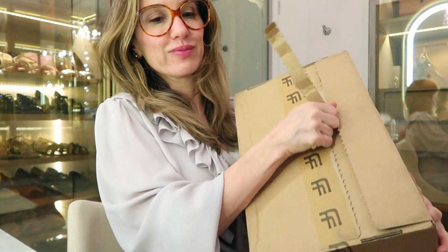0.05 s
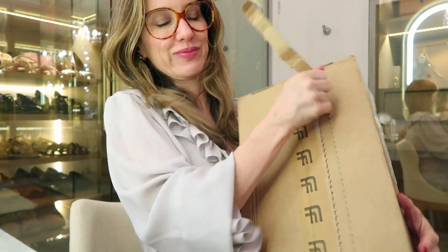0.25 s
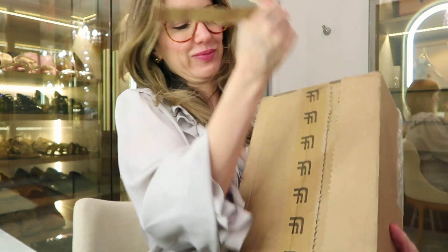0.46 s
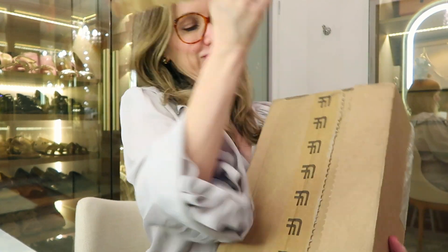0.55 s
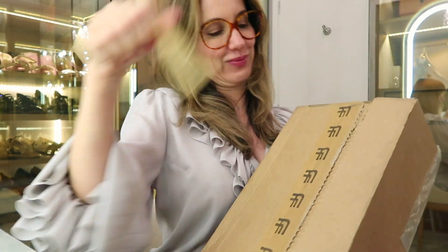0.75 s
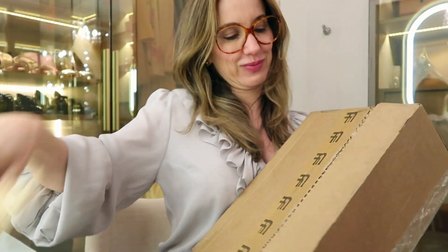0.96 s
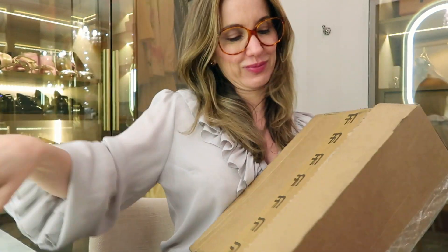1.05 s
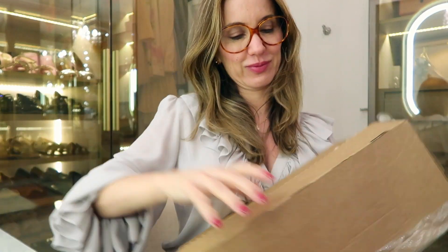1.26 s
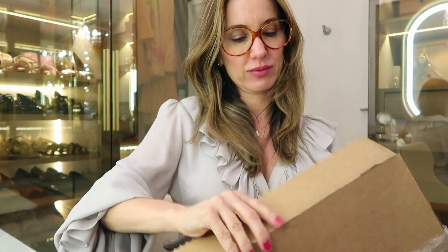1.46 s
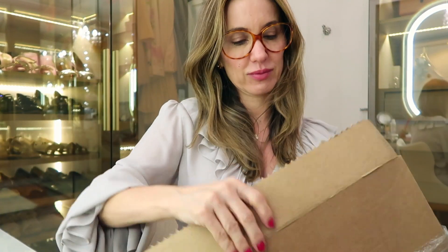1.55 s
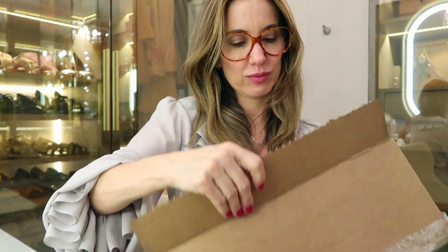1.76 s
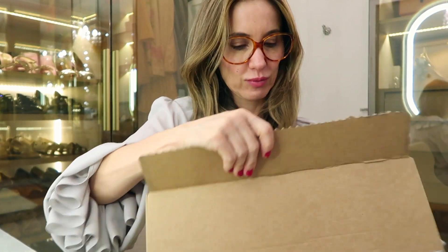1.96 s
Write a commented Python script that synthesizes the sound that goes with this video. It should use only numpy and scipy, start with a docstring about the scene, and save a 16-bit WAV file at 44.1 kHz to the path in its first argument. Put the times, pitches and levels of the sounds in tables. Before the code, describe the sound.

A cardboard box is torn open by hand: its strip comes off in one quick, crackling rip with hollow knocks. After a lull, the flaps are pried up with softer rasps and cracks, close to the microphone in a quiet room.

```python
"""A quiet room hums faintly around a cardboard box, close to a stereo microphone.
After a light rustle, a strip rips off from about 0.24 to 0.5 s: thousands of fibres snap, the edge
sticks and slips in sharp cracks, and knocks ring the hollow box. A lull follows. From about 1.15 s
to the end at 2 s, a hand pries the flaps with softer rasps, cracks and knocks."""
import sys
import numpy as np
from scipy import signal
from scipy.fft import rfft, irfft
from scipy.io import wavfile
from scipy.ndimage import uniform_filter1d

SR = 44100
rng = np.random.default_rng(int(sys.argv[2]) if len(sys.argv) > 2 else 0)


def waveform_to_disk(signal):
    """Save audio, clipped to [-1, 1], as 16-bit WAV at the path in sys.argv[1]."""
    frames = np.transpose(np.atleast_2d(signal))
    scaled = np.clip(frames, -1, 1) * 32767
    samples = np.round(scaled).astype(np.int16)
    wavfile.write(sys.argv[1], SR, samples)


N = 88200

# Tone of the hum that both channels share. Each row: frequency in Hz, relative level in dB.
HUM_TONE = [(15, -41.5), (30, -19), (50, -2), (75, -11), (100, -3.5), (150, 2), (210, -11.5), (300, -23.5),
            (500, -22.5), (1000, -25.5), (3500, -32.5), (7000, -39.5), (10000, -46.5), (15500, -65)]
# Tone of the hum's left-right difference. Each row: frequency in Hz, relative level in dB.
HUM_SIDE_TONE = [(35, -31), (60, -21), (220, -12), (320, -3), (413, -10), (657, -12), (829, -11),
                 (999, -14.5), (15500, -33)]
# The room's echo. Each row: frequency in Hz, seconds to fade by 60 dB.
ECHO_TIMES = [(100, 0.24), (500, 0.48), (1500, 0.44), (4000, 0.29), (10000, 0.35)]
# The notes the box rings at. Each row: frequency in Hz, relative level in dB, seconds to fade by 60 dB.
BOX_NOTES = [(84.4, -19, 0.15), (92, 2, 0.19), (121.4, 1, 0.215), (153, -4.5, 0.1), (187, -0.5, 0.32),
             (208.3, -7, 0.11), (266, -4, 0.13), (327, 0.5, 0.056), (400, -2, 0.054), (535, 0, 0.056),
             (602, -3.5, 0.094), (700, 5, 0.065), (778, 14, 0.039), (910, -2.5, 0.13), (991, -2.5, 0.43),
             (1047, -2.5, 0.19), (1227, 5.5, 0.071), (1260, -6, 0.073), (1486, -12.5, 0.15)]
# Knocks and short rubs. Each row: start in seconds, level in dB, centre of the notes struck in Hz,
# reach to either side in octaves, contact time in seconds.
KNOCKS = [(0.2373, -13, 115, 0.47, 0.0013), (.28, -15, 85.5, 0.75, 0.011), (.295, -21, 630, 0.067, 0.00039),
          (.32, -27.5, 1500, 0.072, .03), (.424, -18, 588, 0.11, 0.00063), (.468, -26, 1114, 0.15, 0.026),
          (.474, -22.5, 1030, .06, 0.00039), (1.177, -34, 357, 0.35, 0.00067),
          (1.4015, -15.5, 160.6, 0.61, 0.0019), (1.440, -36, 746, 0.19, 0.011),
          (1.580, -27.5, 517, 0.35, .02), (1.70, -34, 86, 0.63, 0.0085), (1.827, -31.5, 356, 0.27, 0.023),
          (1.945, -30, 290, 0.32, .025)]
# Bursts of cracks. Each row: start in seconds, level in dB, length in seconds,
# level change over the burst in dB, slips per second, low edge in Hz, high edge in Hz.
CRACKS = [(0.15, -44.5, .006, 13, 900, 1000, 5300), (0.2378, -17.5, .003, -6, 980, 597, 9000),
          (0.249, -18.5, .010, -9, 1500, 2350, 3700), (0.269, -25, 0.0095, -17.5, 950, 950, 3500),
          (0.26, -18, .005, 6, 1700, 2500, 3730), (0.282, -20, 0.014, -8, 1000, 900, 3500),
          (0.299, -23.5, 0.004, -5, 1200, 2420, 3800), (.310, -24.5, 0.006, -12.5, 1400, 2065, 3730),
          (0.396, -24.5, .006, -6, 1300, 1000, 5120), (0.4231, -11.5, .0065, 2, 610, 466, 3370),
          (0.478, -25.5, 0.0051, 14, 1200, 1820, 4500), (1.087, -57, .02, 1, 900, 1370, 2310),
          (1.162, -26, 0.0029, -7, 870, 1630, 7850), (1.401, -32.5, 0.0049, -6, 760, 2220, 3430),
          (1.576, -41, 0.0045, 2, 750, 1200, 2540), (1.688, -26.5, 0.017, -7, 800, 1130, 4100),
          (1.703, -36, 0.0029, -3, 1100, 890, 5000)]
# Tone of one slip. Each row: frequency in Hz, relative level in dB.
SLIP_TONE = [(200, -13.5), (600, 0), (1200, 2.5), (2000, -0.5), (3000, 4.5), (4500, -14.5), (8000, -33),
             (15500, -44)]
# The rip, then the prying, in groups of rows. Each row: time in seconds, relative fizz level in dB,
# then how many dB above the fizz the low rasp, high rasp, board ring and box boom are.
TEARING = [
    [(0.0, -54.5, 5.5, 0, 4.5, 15.7), (0.128, -62, 3.5, 2, 1.5, 15.6), (0.15, -49, -3, -5, -1, 8.5),
     (0.178, -50, 1.5, -17, -1, 3), (0.218, -46, -2, 7, 4, 4.4), (0.233, -38.5, 6, -2, -5, 16)],
    [(0.238, -25.5, -3, 1.7, 6.5, 20.4), (0.254, -24.5, 8, 7, 2, 2), (0.272, -28.5, 15.5, 0, 14, 11),
     (0.288, -26, -1, 1.6, 7, 1), (0.312, -30, 8, 6.2, 6.3, 7), (0.332, -36.5, -7, 1.5, 10.4, 13),
     (0.368, -45, 13, 3.6, 9.4, 9.9), (0.402, -37.5, 8, 2.7, 9, 7.8), (0.419, -37, -3, 9.1, 7.1, 14.3)],
    [(0.43, -30, 0, -17, 12.5, 15.5), (0.452, -41, -2.5, 3, -13, 11), (0.476, -37, 9, -5, 13.5, 11.2),
     (0.696, -81.5, -1, 4, 23, 28.3), (0.726, -63.5, 7, 1.5, 10, 4.8), (0.976, -82, 6, -14, 3.5, 30),
     (1.09, -64.5, 10, -6, 9.5, 8), (1.154, -60.5, 8, 3, 6, 20), (1.159, -58, 7, -4, -7, 1)],
    [(1.163, -46.5, 19.5, 8.6, 9.5, -7), (1.175, -45.5, 7, 5.7, 2.5, -3), (1.223, -51.5, 14, 1, -1.5, 16),
     (1.229, -57, 14, 2, 10, 16), (1.281, -51, 3, 0.67, 4, 10), (1.331, -47.5, 6.5, 0.6, 3.5, -16),
     (1.373, -45, 3, 1.3, 7.5, -5), (1.398, -43, 5.5, 2.3, 3, -4)],
    [(1.41, -42.5, 1.5, 2, 11, 20.6), (1.432, -48, 9, 4.5, 5.7, 21.2), (1.564, -46, 3.5, -4, 5.3, 7.7),
     (1.59, -45.5, 16, -10, 4.3, 4.3), (1.66, -46, 2.5, 5.5, 14.4, 14), (1.686, -41.5, 9.5, -3, 12, 3.6)],
    [(1.69, -37, 12.5, 12, 7.7, -4), (1.718, -36, 3.5, -5, 8.1, -8), (1.746, -47.5, 2, -6, 7, 4),
     (1.812, -51.5, 12, -9, 5.7, 11), (1.834, -46, 2.5, 4, 13.5, 6), (1.862, -46.5, 8.5, 1, 4.9, 1),
     (1.892, -42, 3, -4, 2.2, -2.5), (1.948, -46, 6, 3.5, 11, 12), (2.0, -49, 15, 13, 15, -1)],
]
# The bright fizz of a snapping fibre. Each row: frequency in Hz, relative level in dB.
FIZZ_TONE = [(300, -22), (1000, -18.5), (2500, -11), (4000, 1), (5500, -6), (8000, -19), (15500, -47)]
# Broad resonances of the tearing edge. Each row: centre in Hz, width in Hz.
RASP_BANDS = [(1900, 1300), (3020, 450)]
# Treble lift on the box sound that both channels share. Each row: frequency in Hz, gain in dB.
MID_TONE = [(7000, -1), (9000, 6), (10500, -1), (15500, 13.5)]
# Tone of the box sound's left-right difference. Each row: frequency in Hz, relative gain in dB.
SIDE_TONE = [(60, -45), (150, -61), (300, -25), (700, -20.5), (1300, -20), (1800, -20), (2400, -16.5),
             (3100, -7.5), (4400, 0), (8000, 12.5), (11000, 22), (15000, 25)]

HUM_DB, HUM_SIDE_DB = -50, -60
SNAPS_PER_S, SNAP_SPREAD_DB, FIBRE_GAIN_DB = 5000, 0.5, -1.5
BOOM_TOP_HZ = 380  # the hollow box booms below this, the board rings above
HELD_RING = 0.2  # hands on the box cut its ring time to this fraction
BOX_LOW_HZ = 65  # the box is too small to sound well below this
KNOCK_SPAN_S = 0.019  # a knock's level is its energy spread over this time


def amp(db):
    """Turn decibels into a multiplier."""
    return 10 ** (np.asarray(db) / 20)


def unit_level(x):
    """Scale a sound to an average power of 1."""
    return x / np.sqrt(np.mean(x ** 2) + 1e-20)


def value_at(table, hz):
    """Read a table between its frequencies."""
    table_hz, value = np.transpose(table)
    return np.interp(np.log(hz + 1), np.log(table_hz + 1), value)


def add(mix, start_s, sound):
    """Mix a sound in at its start time."""
    part = mix[round(start_s * SR):][:len(sound)]
    part += sound[:len(part)]


def coloured(x, tone):
    """Filter a sound with a tone table."""
    gain = amp(value_at(tone, np.fft.rfftfreq(4096, 1 / SR)))
    cepstrum = irfft(np.log(gain))
    cepstrum[1:2048] *= 2  # folded so the filter rings only after a click, never before
    cepstrum[2049:] = 0
    response = irfft(np.exp(rfft(cepstrum)))[:2048]
    return signal.oaconvolve(x, response)[:len(x)]


def room_hum():
    """Steady low noise: a shared part (mid) and a left-right difference (side)."""
    mid = unit_level(coloured(rng.standard_normal(N), HUM_TONE))
    side = unit_level(coloured(rng.standard_normal(N), HUM_SIDE_TONE))
    return mid * amp(HUM_DB), side * amp(HUM_SIDE_DB)


def room_echo(x):
    """Two tails of random reflections, each frequency fading at its own speed."""
    reflections = np.zeros((2, SR))
    at = np.arange(200, SR - 20, 20) + rng.integers(0, 20, (2, (SR - 201) // 20))
    np.put_along_axis(reflections, at, rng.choice([-1., 1.], at.shape), 1)
    hz, t, bands = signal.stft(reflections, SR, nperseg=512)
    fade = amp(-60 * t / value_at(ECHO_TIMES, hz)[:, None])
    tails = signal.istft(bands * fade, SR, nperseg=512)[1]
    return signal.fftconvolve(x[None], tails / np.linalg.norm(tails[0]), axes=1)[:, :N]


def box_ring(weights_db, time_scale=1):
    """The box struck once: fading sine waves, each turned up or down by its weight."""
    t = np.arange(SR // 2)[:, None] / SR
    hz, db, fade_s = np.transpose(BOX_NOTES)
    levels = amp(db + weights_db - 60 * t / (fade_s * time_scale))
    ring = (levels * np.sin(2 * np.pi * hz * t)).sum(1)
    return ring / np.linalg.norm(ring)


def knocks():
    """Six taps ring the box: packed tight they make a knock, spread out they make a rub."""
    out, note_hz = np.zeros(N), np.transpose(BOX_NOTES)[0]
    for start_s, db, centre_hz, reach, contact_s in KNOCKS:
        tap_s = (np.arange(6) + rng.random(6)) / 6 * contact_s
        taps = np.zeros(int(contact_s * SR) + 2)
        taps[(tap_s * SR).astype(int)] = 1
        weights_db = -6 * (np.log2(note_hz / centre_hz) / reach) ** 2
        knock = signal.oaconvolve(taps, box_ring(weights_db))
        add(out, start_s, np.sqrt(KNOCK_SPAN_S * SR) * amp(db) * knock / np.linalg.norm(knock))
    return out


def cracks():
    """Cardboard sticks and slips, making quick rows of clicks that fade or swell."""
    out = np.zeros(N)
    for start_s, db, length_s, change_db, rate, low_hz, high_hz in CRACKS:
        jitter, wobble = rng.standard_normal((2, 40))
        slip_s = np.r_[0, np.abs(np.arange(1, 40) + 0.1 * jitter[1:]) / rate]
        slip_db = 1.5 * wobble * (slip_s > 0) + change_db * slip_s / length_s
        slips = np.zeros(3000)
        slips[np.clip(slip_s * SR, 0, 2999).astype(int)] = (slip_s < length_s) * amp(slip_db)
        band = signal.butter(2, [low_hz, high_hz], "band", fs=SR, output="sos")
        burst = signal.sosfilt(band, coloured(slips, SLIP_TONE))
        power = (burst ** 2).sum() / (length_s * SR)
        add(out, start_s, amp(db) * burst / np.sqrt(power))
    return out


def tearing_fibres():
    """Fibres snap at random: they fizz, rasp along the edge and shake the board and the hollow box."""
    t = np.arange(N) / SR
    times_s, fizz_db, *above_fizz_db = np.vstack(TEARING).T
    sizes = amp(SNAP_SPREAD_DB * np.minimum(rng.exponential(1, N), 5))
    snaps = sizes * rng.choice([-1, 1], N) * (rng.random(N) < SNAPS_PER_S / SR)
    snaps = unit_level(snaps) * amp(np.interp(t, times_s, fizz_db))
    click, note_hz = signal.unit_impulse(2048), np.transpose(BOX_NOTES)[0]
    peaks = [signal.iirpeak(hz, hz / width, SR) for hz, width in RASP_BANDS]
    rasps = [signal.lfilter(*peak, signal.lfilter(*peak, click)) for peak in peaks]
    board = box_ring(-80 * (note_hz < BOOM_TOP_HZ), HELD_RING)
    boom = box_ring(-80 * (note_hz > BOOM_TOP_HZ) + 5 * np.log2(note_hz / 200), HELD_RING)
    out = coloured(snaps, FIZZ_TONE) / np.linalg.norm(coloured(click, FIZZ_TONE))
    for db, ring in zip(above_fizz_db, [*rasps, board, boom]):
        kicks = snaps * rng.choice([-1, 1], N) * amp(np.interp(t, times_s, db))
        out += signal.oaconvolve(kicks, ring / np.linalg.norm(ring))[:N]
    return amp(FIBRE_GAIN_DB) * out


def scene():
    """Mix hum, box and echo in stereo; left and right differ mostly in the treble."""
    low_cut = signal.butter(2, BOX_LOW_HZ, "high", fs=SR, output="sos")
    box = signal.sosfilt(low_cut, tearing_fibres() + knocks() + cracks())
    echo_mid, echo_side = room_echo(box)
    mid, side = room_hum()
    mid += coloured(box + amp(-8) * echo_mid, MID_TONE)
    side += coloured(amp(-10) * np.roll(box, 5) + amp(-8.5) * echo_side, SIDE_TONE)
    return np.array([mid - side, mid + side])


def record(dry):
    """Gently squeeze the loudest peaks, then cut the highest treble."""
    ceiling, top_hz = 0.85, 15650
    squeezed = dry / (1 + (abs(dry) / ceiling) ** 4) ** .25
    high_cut = signal.firwin(1023, top_hz, window=("kaiser", 9), fs=SR)
    return signal.oaconvolve(squeezed, high_cut[None], "same")


dry = scene()
out = record(dry)
waveform_to_disk(out)
```